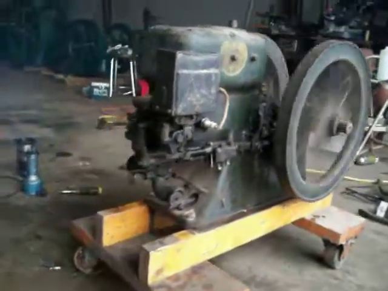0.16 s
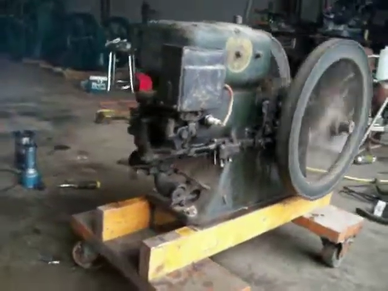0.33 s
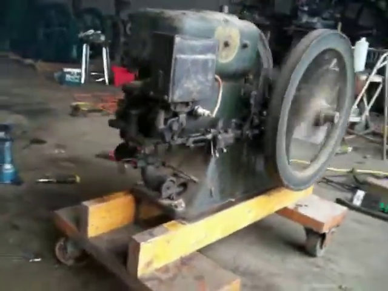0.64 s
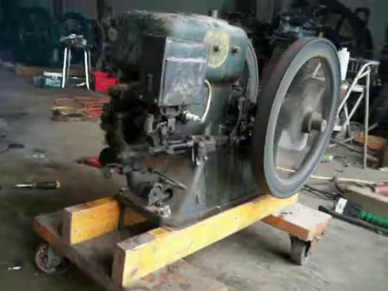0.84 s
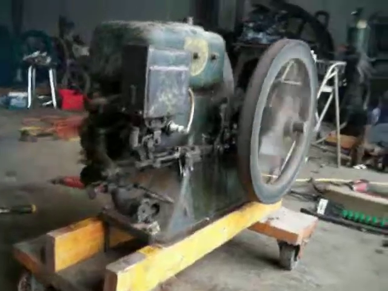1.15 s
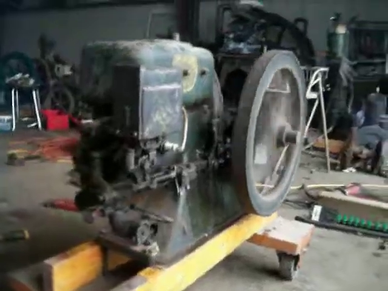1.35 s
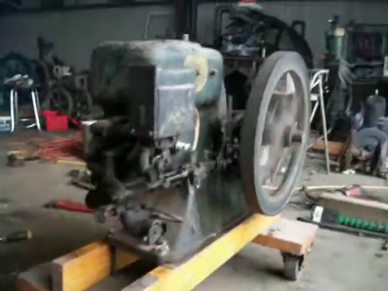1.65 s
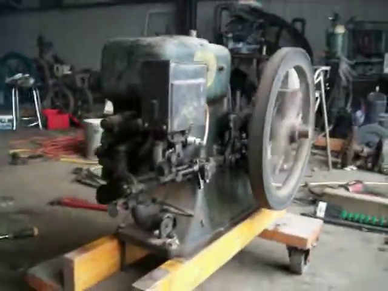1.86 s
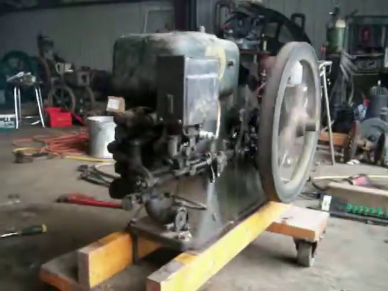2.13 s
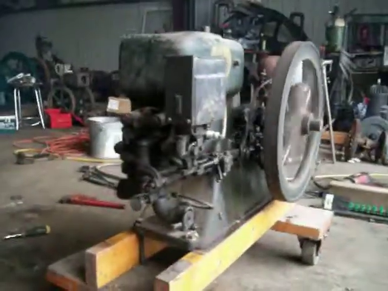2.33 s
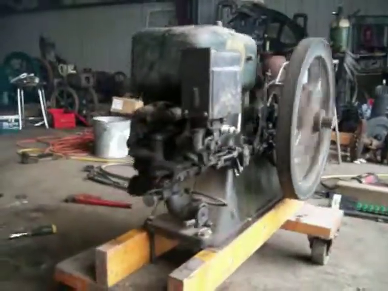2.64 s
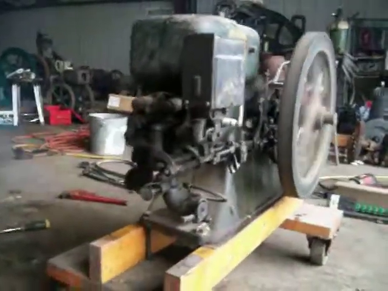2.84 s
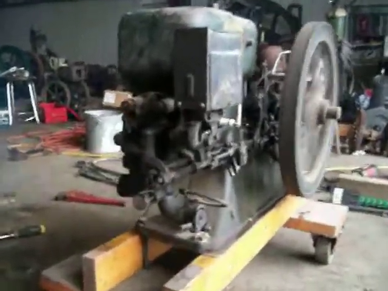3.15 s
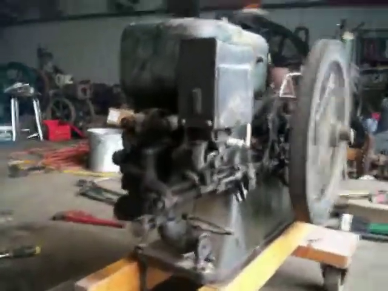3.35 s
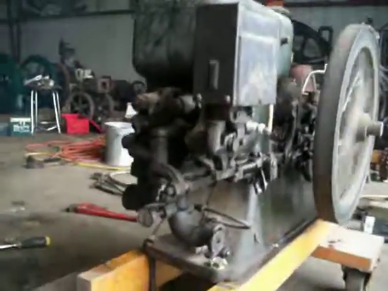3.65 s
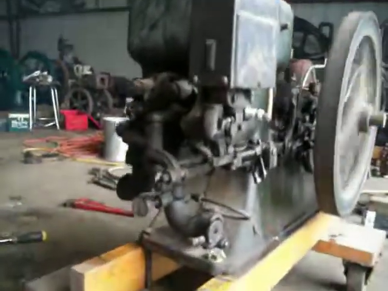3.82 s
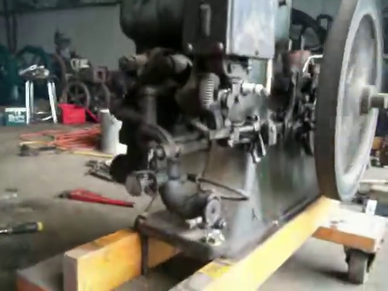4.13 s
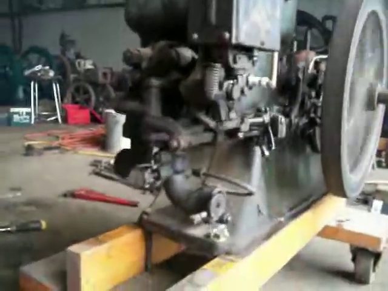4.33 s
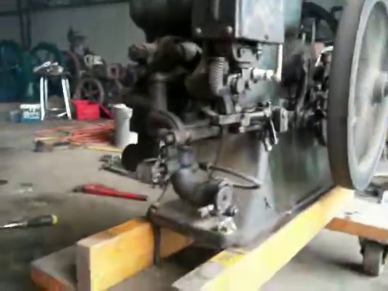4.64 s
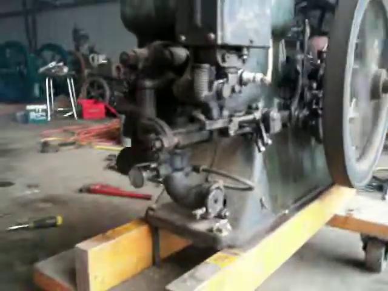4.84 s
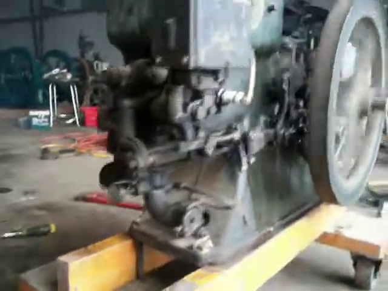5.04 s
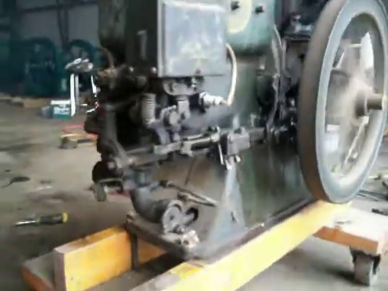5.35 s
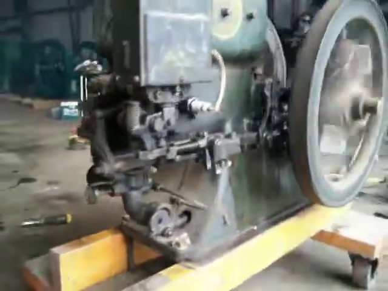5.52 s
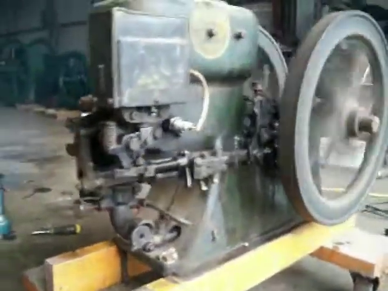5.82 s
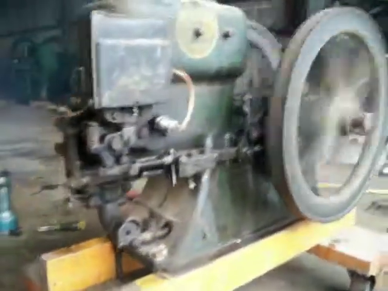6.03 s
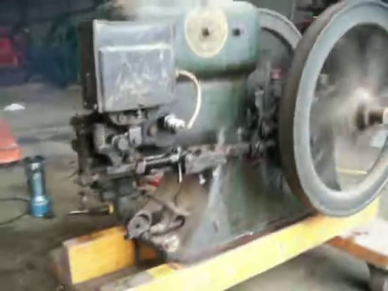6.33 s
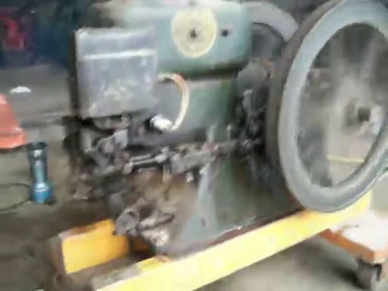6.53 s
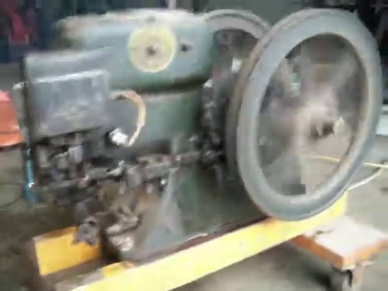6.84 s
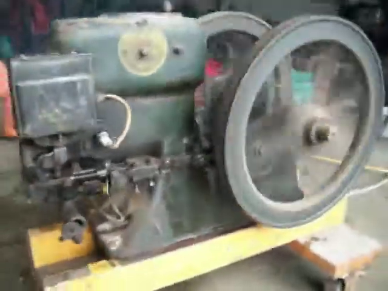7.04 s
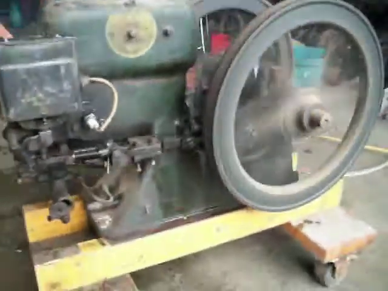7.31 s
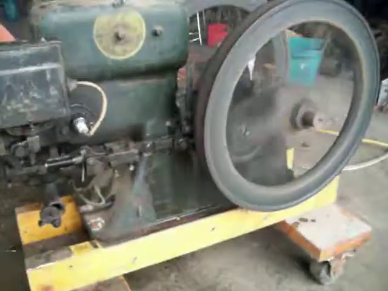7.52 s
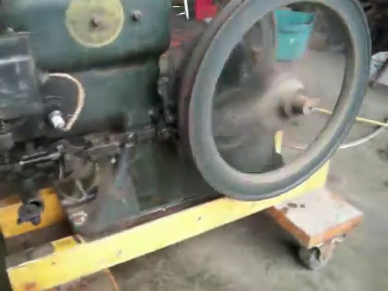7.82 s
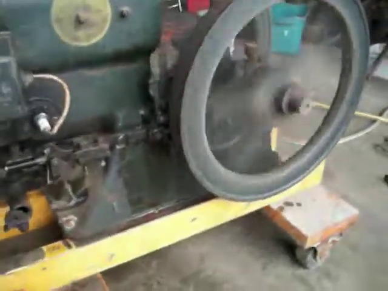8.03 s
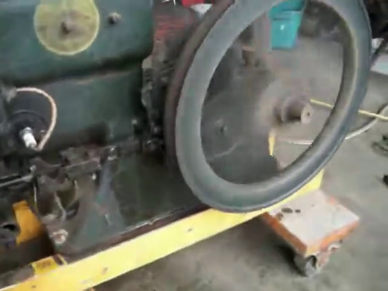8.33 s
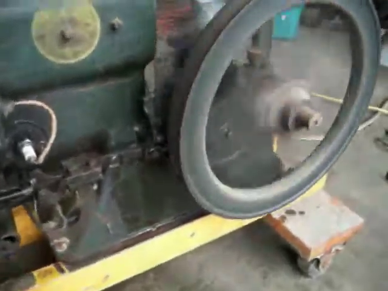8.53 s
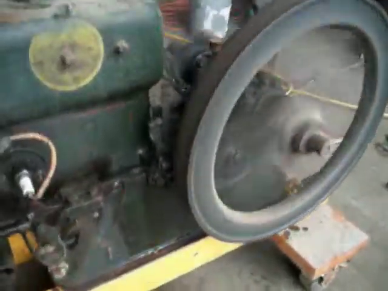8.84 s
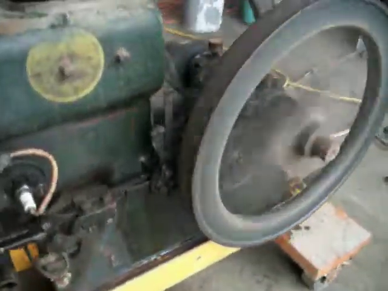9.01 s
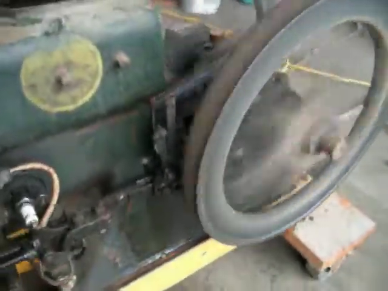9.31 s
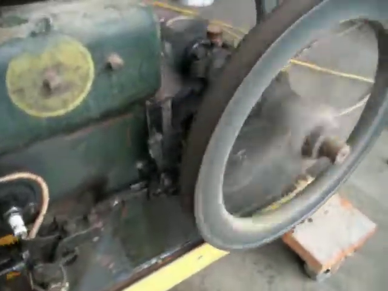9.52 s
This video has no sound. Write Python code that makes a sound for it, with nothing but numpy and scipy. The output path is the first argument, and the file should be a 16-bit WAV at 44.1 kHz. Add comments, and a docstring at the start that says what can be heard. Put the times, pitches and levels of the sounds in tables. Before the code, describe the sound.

The hiss of an earlier firing dies away under the huffing and metallic clacking of a coasting flywheel engine. Six times it draws in air with low gulps, a latch snaps, and exhaust gas bursts out with a thump and sharp hiss. Thin metal squeaks appear now and then. A handheld microphone moves around it in a reverberant workshop, overloading at the bangs, the same on both channels.

```python
"""The hiss of an earlier firing dies away over the panting and clacking of a coasting hit-and-miss engine.
Noise through a bottle-like cavity makes the panting, wavering tones the pipe, noise rung through iron modes
the clacks. Then it snorts in a charge with low gulps and spurts of hiss, and fires: a thump, a short roar and
a bright hiss of gas. Hard workshop walls answer; quick gain control evens out the loudness and peaks clip."""
import sys
import numpy as np
from scipy import signal
from scipy.fft import rfft, irfft, next_fast_len
from scipy.io import wavfile
from scipy.ndimage import map_coordinates

SR = 44100
rng = np.random.default_rng(int(sys.argv[2]) if len(sys.argv) > 2 else 0)


def generate_wav(sig):
    """Save sig (samples, or channels by samples) to the path in sys.argv[1] as 16-bit PCM at SR."""
    pcm = np.round(np.clip(np.atleast_2d(sig).T, -1, 1) * 32767).astype(np.int16)
    wavfile.write(sys.argv[1], SR, pcm)


N = 426447  # length in samples


def amp(db):
    """Amplitude factor of a level in dB."""
    return 10 ** (np.asarray(db) / 20)


def unit(x):
    """x scaled to rms 1."""
    return x / np.sqrt(np.mean(x ** 2) + 1e-20)


def wobble(rate):
    """A smooth random curve, rate knots a second."""
    knots = rng.standard_normal(int(N * rate / SR) + 4)
    return map_coordinates(knots, [np.arange(N) * rate / SR])


def filtered(x, response):
    """x times a complex response of frequency."""
    m = next_fast_len(len(x) + 8192)
    spectrum = rfft(x, m) * response(np.fft.rfftfreq(m, 1 / SR))
    return irfft(spectrum, m)[:len(x)]


def modes(table):
    """Causal response of resonances (Hz, width Hz, dB), with alternating signs."""
    def response(f):
        return sum((-1) ** k * amp(db) * 1j * f * width / (hz * hz - f * f + 1j * f * width)
                   for k, (hz, width, db) in enumerate(table))
    return response


def rush(spectrum, grain_db=0):
    """Noise of rms 1 coloured by (Hz, dB per Hz) points; grain_db makes it spiky."""
    hz, db = np.transpose(spectrum)
    grain = amp(grain_db * wobble(400))
    colour = lambda f: amp(np.interp(np.log(f + 1), np.log(hz + 1), db))
    return unit(filtered(grain * rng.standard_normal(N), colour))


def add(track, s, x):
    """Mixes x into track from second s."""
    part = track[round(s * SR):][:len(x)]
    part += x[:len(part)]


ROOM_T60_S, ROOM_DB = .15, -12


def room(x):
    """The hard walls answer with a short dense tail of noise, drawn anew each quarter second."""
    out, n = np.zeros(N), SR // 4
    for k in range(0, N, n):
        tail = amp(-60 * np.arange(n) / SR / ROOM_T60_S) * rng.standard_normal(n)
        add(out, k / SR, signal.fftconvolve(x[k:k + n], tail / np.linalg.norm(tail)))
    return out


# Cast iron and steel of the valve gear, rung by taps and clacks.
# Each row: resonance in Hz, width in Hz, level in dB.
IRON_MODES = [(920, 220, -8), (2010, 1220, -5), (2800, 210, -4), (3610, 200, -5), (4820, 790, -6),
              (5115, 300, -0.5)]
TICKS_PER_S, CLUMP = 220, 1.1  # middling tap rate, and how strongly it bunches
TICK_DB, TICK_SPREAD_DB = -24.5, 4.5


def ticks():
    """Gear teeth meet in random clumps, each a sharp tap on the iron."""
    chance = TICKS_PER_S / SR * np.exp(CLUMP * wobble(25))
    taps = (rng.random(N) < chance) * amp(TICK_SPREAD_DB * rng.standard_normal(N))
    taps = taps * rng.choice([-1, 1], N)
    return amp(TICK_DB) * unit(filtered(taps, modes(IRON_MODES)))


# A dry joint squeaks. Each row: start in seconds, length in seconds, pitch in Hz, level in dB.
SQUEAKS = [(0.391, 0.14, 4420, -19.5), (2.278, 0.17, 4440, -18), (3.36, 0.11, 4440, -20.5),
           (3.886, 0.1, 4420, -21), (6.998, 0.11, 4380, -19)]
SQUEAK_RISE = .02  # share by which a squeak climbs


def squeaks():
    """A thin, unsteady whistle of rubbing metal that climbs a little."""
    out, waver = np.zeros(N), wobble(150)
    for s, length, hz, db in SQUEAKS:
        n = round(length * SR)
        climb = SQUEAK_RISE * (np.arange(n) / n - .5)
        pitch = hz * (1 + climb + 0.0087 * waver[round(s * SR):][:n])
        tone = np.sin(2 * np.pi * np.cumsum(pitch) / SR)
        add(out, s, amp(db) * tone * signal.windows.tukey(n, .4))
    return out


TURN_S = .277  # a usual cam turn


def cam():
    """Seconds and counted turns of the cam, from its trips and the firings, which share one angle."""
    s = np.sort([row[0] for row in TRIPS + BLASTS])
    s = np.r_[s[0] - TURN_S, s, s[-1] + TURN_S]
    return s, np.r_[0, np.cumsum(np.round(np.diff(s) / TURN_S))]


# Balance as the microphone walks round the engine. Each row: time in seconds, panting in dB,
# cavity in dB over the panting, then the base level of each of the three pipe modes in dB.
WALK = [(0, -19.5, -10, -28.5, -17, -38.5), (2, -19.5, -5.5, -25.5, -18.5, -24),
        (3.7, -19, -6.5, -30, -20.5, -23), (5.3, -19.5, -7, -31.5, -18, -29.5),
        (6.7, -19.5, -3, -24.5, -19.5, -18.5), (7.7, -21, -7, -24, -33, -22),
        (8.55, -18, -11.5, -13.5, -20, -31), (9.67, -18, -12.5, -12, -16.5, -43)]
# Cylinder and port ring like a bottle. Each row: resonance in Hz, width in Hz, level in dB.
CAVITY_MODES = [(273.4, 63, -0.5), (546, 59, -6.5), (894, 80, -9.5)]
CAVITY_DRIFT = 0.12  # largest pitch drift either way, as a share


def cavity_ring():
    """Noise in the bottle-like cavity; crossfades between five tunings make its pitch drift."""
    drift = np.tanh(wobble(6))
    ring = np.zeros(N)
    for k in range(-2, 3):
        tuning = [(hz * (1 + k * CAVITY_DRIFT / 2), width, db) for hz, width, db in CAVITY_MODES]
        share = np.clip(1 - np.abs(2 * drift - k), 0, 1) ** .5
        ring += share * unit(filtered(rng.standard_normal(N), modes(tuning)))
    return ring


# Air pumped through the open exhaust port. Each row: frequency in Hz, level in dB per Hz.
PANT_SPECTRUM = [(20, -7), (165, -5.5), (404, -3), (533, -3.5), (664, -5.5), (993, -3.5), (1600, -19),
                 (2600, -120)]


def panting(t, stroke):
    """Air pumped by the piston, with the cavity ringing along and swelling at each stroke."""
    s, pant_db, cavity_db, *_ = np.transpose(WALK)
    # the panting catches as the cam throws the rod
    catch_db = sum(-5 * np.exp(-((t - row[0] - .006) / 0.0089) ** 2) for row in TRIPS)
    pant = amp(np.interp(t, s, pant_db) + catch_db + 0.19 * np.cos(stroke - 4.5) + 1.18 * wobble(18))
    cavity = cavity_ring() * amp(np.interp(t, s, cavity_db) + 2.2 * wobble(18) + 2.8 * wobble(4))
    swell = 1 + 0.26 * np.cos(stroke - 5.3)
    return pant * (rush(PANT_SPECTRUM, grain_db=2.5) + swell * cavity)


# Modes of the exhaust pipe. Each row: pitch in Hz, scale of the pitch waver, swing over a cam turn in dB,
# where in the turn it is strongest as a share, phase in the stroke in radians.
PIPE_MODES = [(1065, .011, 3.5, 0.57, 1.83), (1920, .016, 1.5, .6, 2.41), (2890, .013, 5, .31, 2.5)]


def pipe_hoot(t, turn, stroke):
    """Each stroke blows the pipe, whose modes hoot as wavering tones."""
    s, _, _, *pipe_db = np.transpose(WALK)
    # the pipe rests over a charge and picks up slowly after a firing
    quiet_db = sum(-10 * np.exp(-((t - start - .07) / 0.16) ** 6) for start, *_ in SNORTS)
    quiet_db += sum(-11 * (t > fired) * np.exp(-np.abs(t - fired) / 0.16) for fired, *_ in BLASTS)
    out = np.zeros(N)
    for (hz, waver, swing_db, share, phase), db in zip(PIPE_MODES, pipe_db):
        puff = ((1 + np.cos(stroke - phase)) / 2) ** 1.7
        pitch = hz * (1 + waver * (1.2 * wobble(16) + 3 * wobble(220)))
        hoot = np.sin(2 * np.pi * np.cumsum(pitch) / SR)
        uneven_db = swing_db * np.cos(turn - 2 * np.pi * share) + 1.7 * wobble(14) + 3.4 * wobble(90)
        out += amp(np.interp(t, s, db) + uneven_db + quiet_db) * puff * hoot
    return out


# Rattle of the gears. Each row: frequency in Hz, level in dB per Hz.
GEAR_SPECTRUM = [(760, -24), (1300, 0.5), (2890, -0.5), (3960, -3.5), (4380, 2.5), (5480, -17),
                 (13800, -120)]


def gear_rattle(stroke):
    """Spiky bright noise of the gears, swelling slightly with each stroke."""
    level = amp(-21 + 1.1 * np.cos(stroke - 2.9) + 3.3 * wobble(40))
    return level * rush(GEAR_SPECTRUM, grain_db=2.5)


# The ports are shut while the engine draws in and again while it compresses.
# Each row: middle in seconds after the snort, half length in seconds, level change in dB.
SHUT_PORTS = [(0.038, 0.042, -11), (0.143, 0.053, -7.5)]


def coasting():
    """Four piston strokes a cam turn drive panting, gear rattle and pipe; shut ports quieten them."""
    t = np.arange(N) / SR
    turn = 2 * np.pi * np.interp(t, *cam())
    stroke = 4 * turn
    shut_db = sum(db * np.exp(-((t - start - mid) / half) ** 4)
                  for start, *_ in SNORTS for mid, half, db in SHUT_PORTS)
    air = panting(t, stroke) + pipe_hoot(t, turn, stroke)
    return amp(shut_db) * air + amp(shut_db / 2) * gear_rattle(stroke)


# The cam throws the push rod once every two flywheel turns; the rod clacks and rebounds.
# Each row: time in seconds, clack in dB, rebound after seconds, rebound in dB.
TRIPS = [(0.2681, -2, .042, -4), (.5543, -7, .051, -10), (1.335, -5.5, .04, -15.5), (1.6035, -5, .038, -10),
         (1.878, -3, .043, -8), (2.161, -2.5, .04, -10), (2.4533, -5.5, .051, -5.5),
         (3.2731, -0.5, .04, -10.5), (3.5492, -5, .037, -9), (3.8326, -5, .04, -8), (4.1211, -7, .052, -7),
         (4.9525, -3, .04, -5), (5.227, -9, .043, -5), (5.517, -4.5, .05, -5), (6.0642, -1, .041, -6.5),
         (6.331, -2, .038, -9), (6.602, -5, .039, -5.5), (6.881, -4, .04, -5), (7.1712, -8, .049, -5.5),
         (7.978, -6.5, .045, -7), (8.256, -3, .04, -6), (8.539, 1.5, .036, -4.5), (8.821, -2.5, .047, -6),
         (9.635, -1.5, .04, -10)]
# The governor lets go and the valve gear closes up for a charge.
# Each row: seconds after the snort, level in dB, loudest pitch in Hz.
LATCH = [(.081, -14, 3520), (.114, -7, 4420)]
# Slack in the gears knocks at set cam angles. Each row: share of a cam turn, middle level in dB,
# loudest pitch in Hz.
SLACK = [(.25, -15, 3900), (.375, -16.5, 2320), (.59, -18, 2420), (.73, -17, 2840), (.865, -16.5, 3450)]
# More single ticks and knocks, typed by time. Each row: time in seconds, level in dB, loudest pitch in Hz.
SINGLE_KNOCKS = [(0.122, -8.5, 5160), (0.831, 1.5, 4070), (2.082, -14.5, 2940), (2.1489, -12.5, 4200),
                 (2.714, -8.5, 4050), (3.901, -15, 4360), (4.1068, -6, 4130), (4.2013, -15, 5070),
                 (4.337, -6, 4550), (4.939, -12.5, 4020), (5.153, -11, 3320), (5.764, -15.5, 4600),
                 (6.498, -9.5, 2790), (6.5308, -8, 3560), (6.8086, -8, 2860), (6.949, -13, 3000),
                 (7.421, -18, 4220), (7.657, -4, 4790), (8.0508, -8, 4100), (8.1844, -9, 2220),
                 (8.219, -9.5, 3320), (8.2455, -9.5, 2500), (8.3241, -16.5, 3560), (8.388, -13, 4030),
                 (8.419, -14.5, 3500), (8.5193, -7, 2360), (8.6634, -7, 3800), (8.787, -8, 2520),
                 (9.262, -4.5, 5070)]
SLACK_SPREAD_DB, SLACK_SCATTER_S = 2, .003
TRIP_HZ, REBOUND_HZ, LATCH_HZ = 5124, 3520, 3680  # loudest pitches; the rebound's scatters
CHATTER_S, CHATTER_DB = .016, -3  # the latch chatters just before it lands


def contacts():
    """Every knock of the valve gear as (s, dB, loudest Hz)."""
    rows = [(s, db, TRIP_HZ) for s, db, *_ in TRIPS] + SINGLE_KNOCKS
    rows += [(s + after, db, REBOUND_HZ * np.exp(rng.normal(0, 0.18))) for s, _, after, db in TRIPS]
    rows += [(row[0] + after, db, hz) for row in SNORTS for after, db, hz in LATCH]
    rows += [(s + lands - k * CHATTER_S, db + k * CHATTER_DB, LATCH_HZ)
             for s, _, lands, db in SNORTS for k in range(2)]
    s, turns = cam()
    for k in range(int(turns[-1])):
        for share, db, hz in SLACK:
            at = np.interp(k + share, turns, s) + SLACK_SCATTER_S * rng.normal()
            level = db + SLACK_SPREAD_DB * rng.normal()
            # no slack from intake until the gas is out
            if not any(0 < at - row[0] < 1.6 * TURN_S for row in SNORTS):
                rows.append((at, level, hz))
    return [row for row in rows if .02 < row[0] < N / SR]


def clacks():
    """Each contact is a short rattle of noise into the iron, with one more mode at its loudest pitch."""
    out, lead = np.zeros(N), .012  # seconds of swell before the contact
    t = np.arange(SR // 20) / SR - lead
    swell = np.exp(-np.abs(t) / np.where(t < 0, .0025, .0048))
    for s, db, top_hz in contacts():
        iron = [(hz * rng.normal(1, 0.04), width, level + rng.normal(0, 2))
                for hz, width, level in IRON_MODES]
        iron.append((top_hz, 1200, 0))
        ring = unit(filtered(swell * rng.standard_normal(len(t)), modes(iron)))
        add(out, s - lead, amp(db) * np.sqrt(np.mean(swell ** 2)) * ring)
    return out


# Intake snorts before the firings. Each row: start in seconds, level in dB,
# the latch lands after seconds, latch in dB.
SNORTS = [(0.627, -12.5, .131, -10.5), (2.528, -13, .151, -2.5), (4.195, -13, .151, -3.5),
          (5.59, -12.5, .149, -5.5), (7.243, -15.5, .149, -3.5), (8.894, -12, .148, -5)]
# The intake valve flutters on its spring. Each row: seconds after the first gulp, level in dB,
# suck-back share.
FLUTTER = [(0, 1, .6), (.022, 5, .2), (.045, 4.5, .15), (.064, -1, .3)]
# Escaping gas, also heard in the blasts. Each row: frequency in Hz, level in dB per Hz.
GAS_SPECTRUM = [(15, -33), (45, 6.5), (110, 1.5), (250, -23.5), (800, -3.5), (1500, -9), (2100, -1.5),
                (3100, -1), (4700, 3), (5600, -2), (6300, -11.5), (8000, -55)]
# the intake valve shudders shut with a dull rumble
SEAT_AFTER_S, SEAT_LENGTH_S, SEAT_DB, SEAT_HZ = .092, 0.028, -12.5, 170


def snorts():
    """Every flutter of the intake valve is a low gulp followed by a spurt of hiss; then it seats."""
    gulps, spurts, t = np.zeros(N), np.zeros(N), np.arange(SR // 10) / SR
    push = np.exp(-((t - .004) / np.where(t < .004, .0008, .0022)) ** 2)
    back = np.exp(-((t - .0105) / 0.0032) ** 2)
    spurt = 0.047 * (t < .04) + np.exp(-((t - .013) / 0.0086) ** 2)
    seat = np.exp(-((t - .05) / SEAT_LENGTH_S) ** 4)
    for start, db, *_ in SNORTS:
        for after, step_db, suck in FLUTTER:
            at = start + after - .004
            add(gulps, at, amp(db + step_db + rng.normal()) * (push - suck * back))
            add(spurts, at, amp(db + step_db - 10.0 - 130 * after) * spurt)
        rumble = unit(filtered(rng.standard_normal(len(t)), modes([(SEAT_HZ, 120, 0)])))
        add(gulps, start + SEAT_AFTER_S - .05, amp(db + SEAT_DB) * seat * rumble)
    hiss = rush(GAS_SPECTRUM, grain_db=2.5)
    whistle = filtered(hiss, modes([(4660, 1700, 11.1)]))  # of the narrow valve gap
    return gulps + spurts * (hiss + whistle)


# The exhaust valve opens on a fired charge. Each row: time in seconds, thump in dB, hiss in dB,
# where the hiss is sharpest in Hz, below which it thins in Hz.
BLASTS = [(0.7957, 12, -6, 4050, 1550), (2.725, 5, -6.5, 4930, 1450), (4.3928, 9, -8, 4900, 1480),
          (5.785, 5.5, -6.5, 4760, 1850), (7.438, 3.5, -8.5, 4760, 2640), (9.088, 2.5, -9, 4600, 1655)]
HOLD_S = 0.25  # the hiss holds about this long, where its fade reaches half
# the jet surges as pressure runs up and down the pipe
SURGE_S, SURGE_DEPTH, SURGE_DIES_S = 0.029, 0.39, 0.09


def blasts():
    """Gas leaks as the valve lifts, then a suction thump, a short roar and a hiss that holds and fades."""
    out, lead = np.zeros(N), .03  # seconds of leak before the valve opens
    t = np.arange(2 * SR) / SR - lead
    gas = amp(1.1 * wobble(45)) * rush(GAS_SPECTRUM, grain_db=1.5)
    thump = -np.exp(-(t / 0.00038) ** 2) + 0.07 * np.exp(-(t / 0.005) ** 2)
    thump -= 0.053 * (t > 0) * np.exp(-np.abs(t) / .03) * np.cos(2 * np.pi * 48 * t)  # the pipe booms
    leak = 0.2 * np.exp(np.minimum(t, 0) / 0.0082)
    lift = leak + 2.43 / (1 + np.exp(-(t - .004) / 0.0029))
    roar = 1 / (1 + np.abs(t / 0.022) ** 6)
    surge = SURGE_DEPTH * np.exp(-np.abs(t) / SURGE_DIES_S) * np.cos(2 * np.pi * (t - .004) / SURGE_S)
    fade = (1 + surge) / (1 + np.abs(t / HOLD_S) ** 2.66)
    for s, thump_db, db, hz, edge_hz in BLASTS:
        jet = np.roll(gas, -round(s * SR))[:len(t)]
        jet = jet + filtered(jet, modes([(3100, 120, -4), (hz, 120, -4), (hz, 650, -1.5)]))  # the gap whistles
        jet = filtered(jet, lambda f: 0.5 + 0.39 / (1 + (edge_hz / (f + 1)) ** 8))
        bang = 0.15 * jet + 1.6 * rng.standard_normal(len(t))  # the first rush is loud at every pitch
        add(out, s - lead, amp(thump_db) * thump + amp(db) * lift * (roar * bang + fade * jet))
    out[:len(t)] += amp(-17.5 - 35 * t) * gas[-len(t):]  # an earlier firing is still dying away
    return out


def scene():
    """The engine with its answer from the walls, and the snorts close and dry, alike on both channels."""
    engine = coasting() + ticks() + squeaks() + clacks() + blasts()
    return np.tile(engine + amp(ROOM_DB) * room(engine) + snorts(), (2, 1))


BAND_HZ, TOP_HZ = 5824, 15900  # sound band before clipping, and the top of what clipping adds


def record(dry):
    """Quick gain control that lags behind each hit, a soft overload, a band limit, then clipped peaks."""
    x = dry[0]
    power = x ** 2
    for lag_s in (.008, .012):
        keep = np.exp(-1 / (lag_s * SR))
        power = signal.lfilter([1 - keep], [1, -keep], power, zi=[keep * amp(-20.0)])[0]
    x = x * (amp(-32.5) / power) ** 0.49  # nearly full levelling
    x = x / (1 + np.abs(x / .8) ** 4) ** .25
    x = filtered(x, lambda f: 1 / (1 + (f / BAND_HZ) ** 40) * (f < 1.08 * BAND_HZ))
    x = filtered(np.clip(x, -.68, .68), lambda f: f < TOP_HZ)
    return np.tile(x, (2, 1))


dry = scene()
out = record(dry)
generate_wav(out)
```